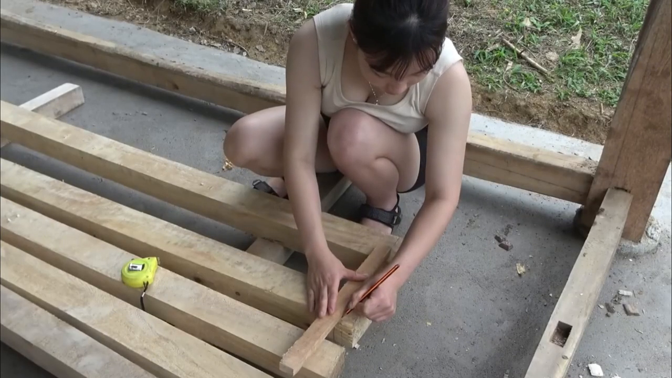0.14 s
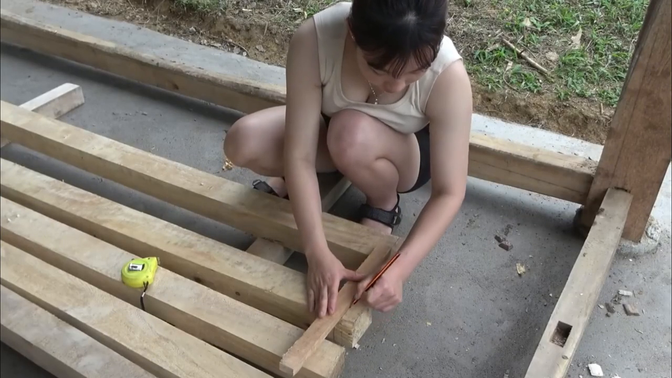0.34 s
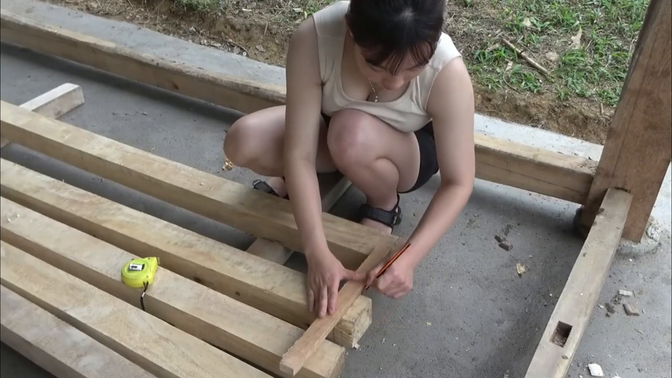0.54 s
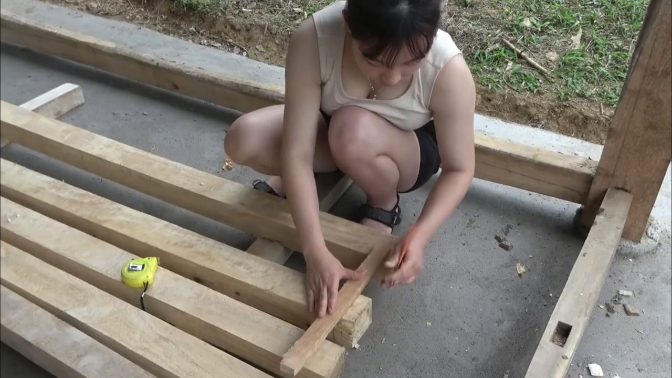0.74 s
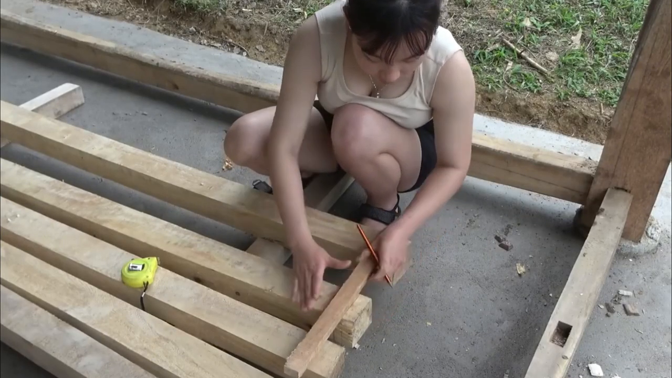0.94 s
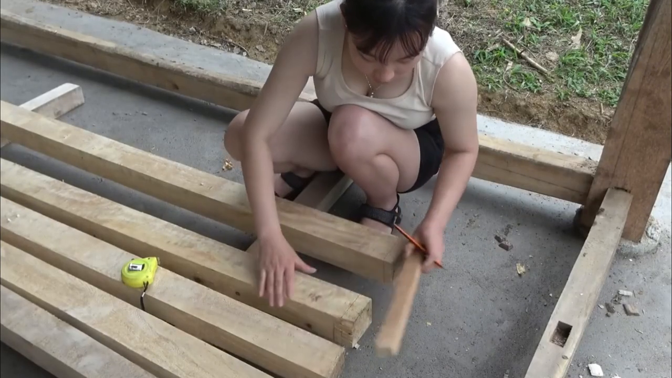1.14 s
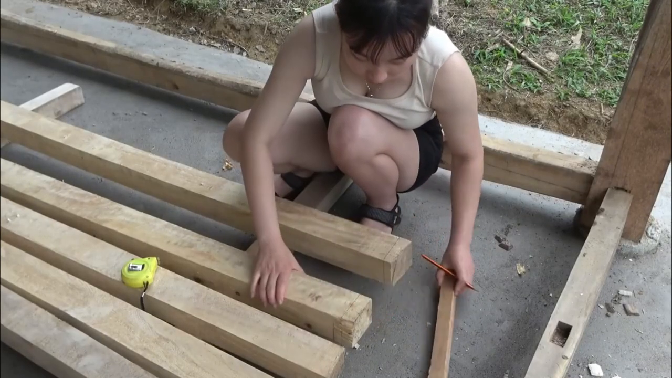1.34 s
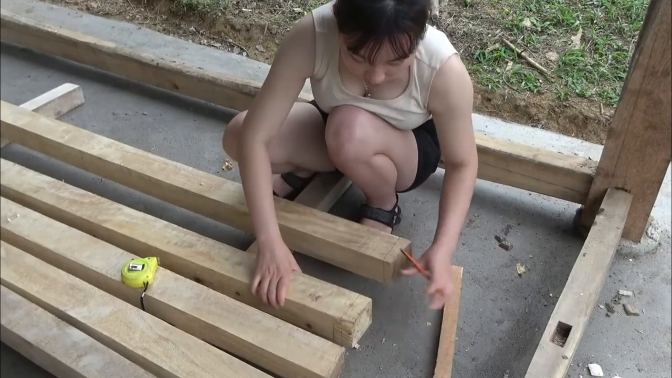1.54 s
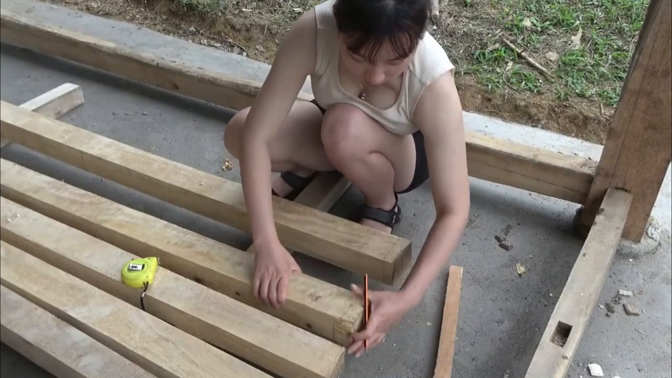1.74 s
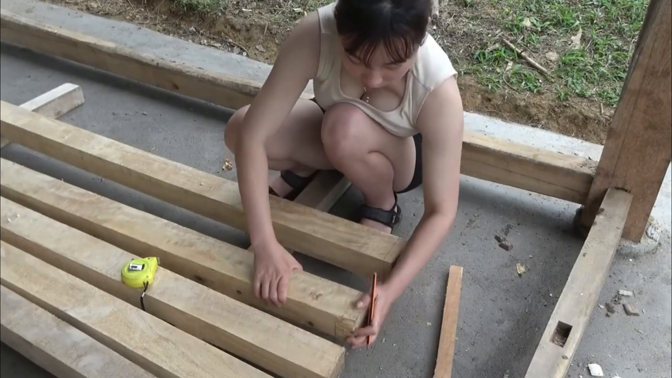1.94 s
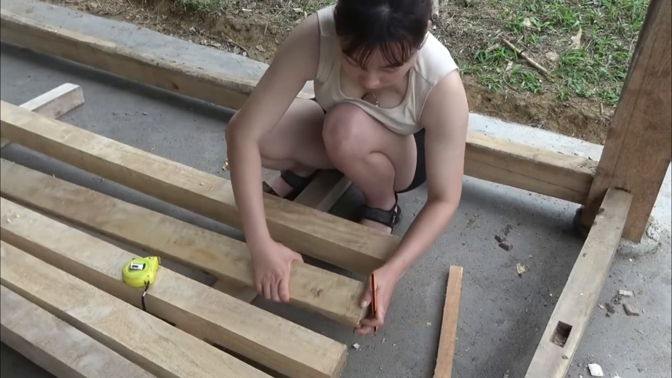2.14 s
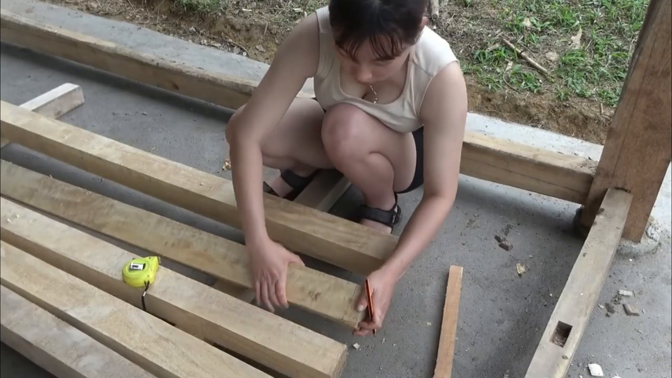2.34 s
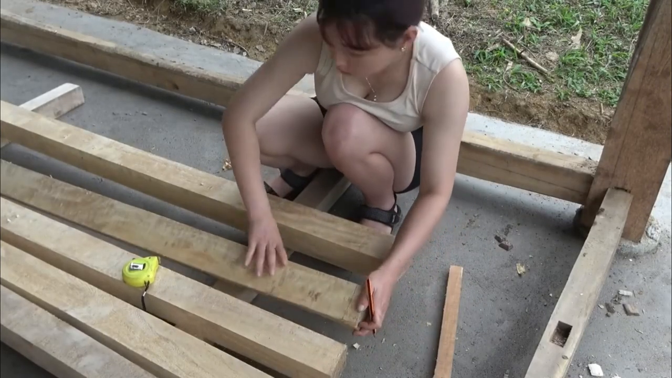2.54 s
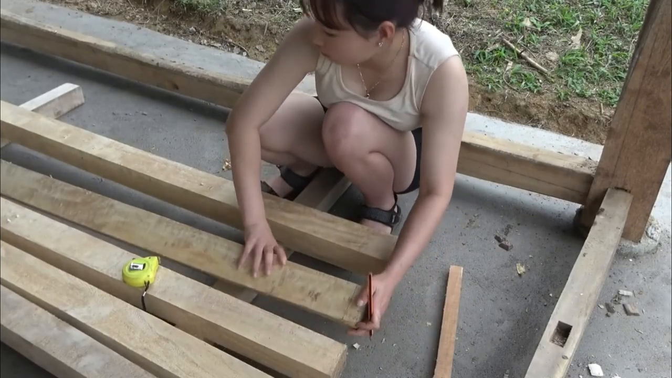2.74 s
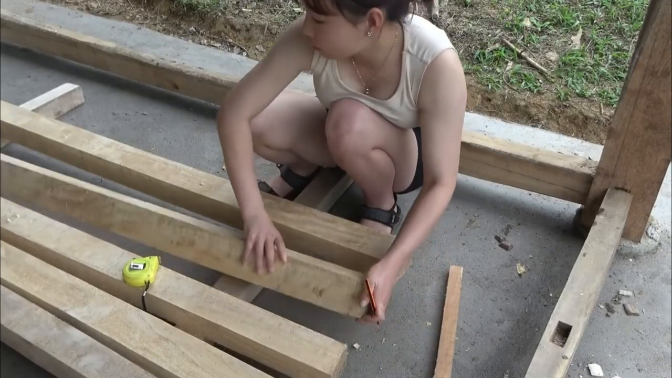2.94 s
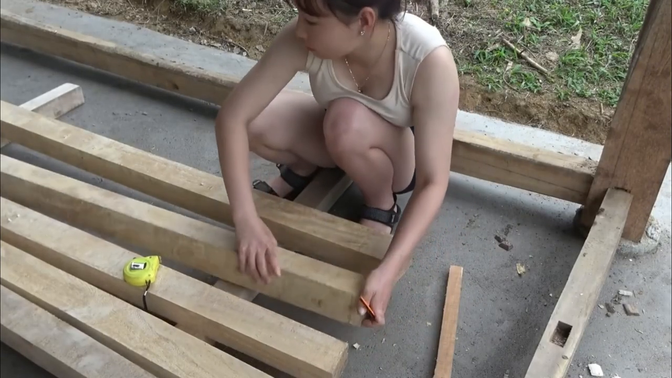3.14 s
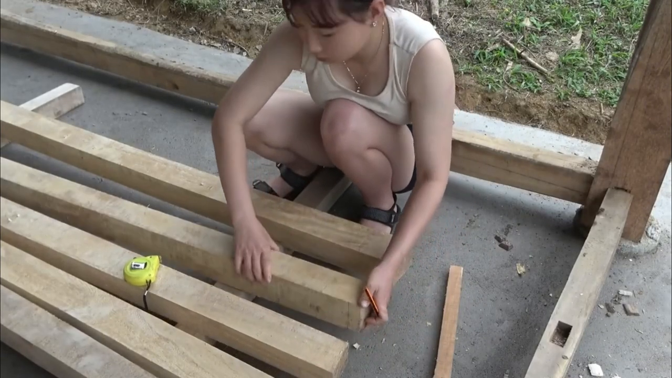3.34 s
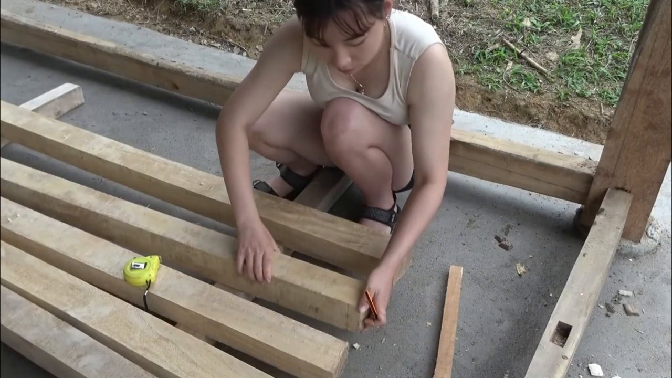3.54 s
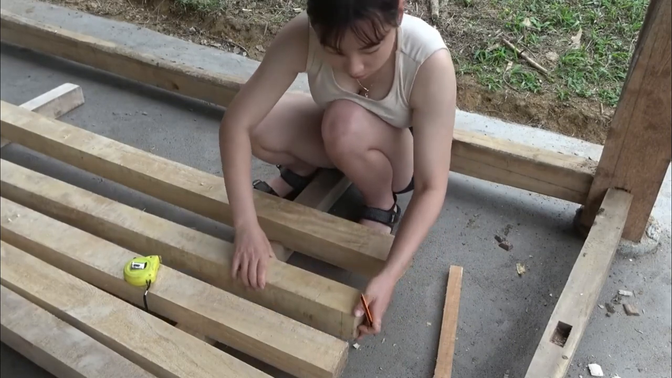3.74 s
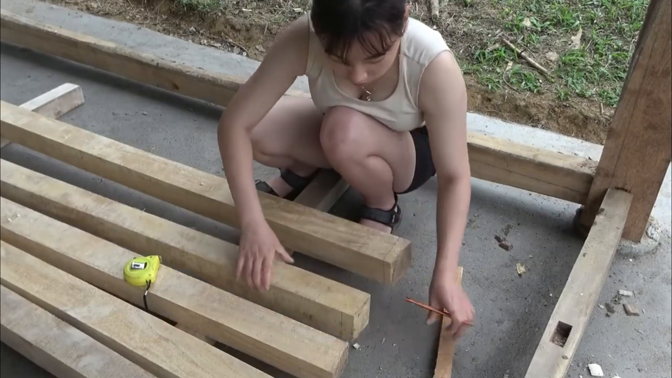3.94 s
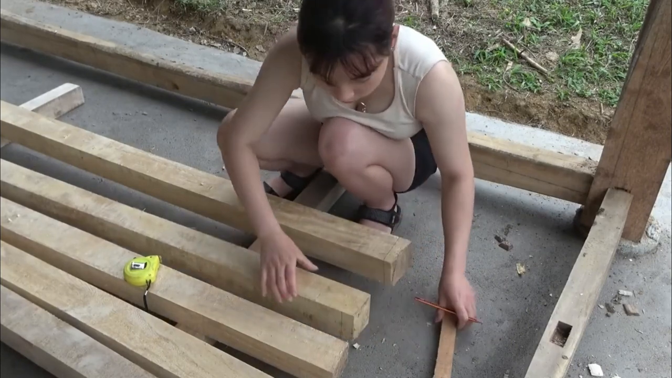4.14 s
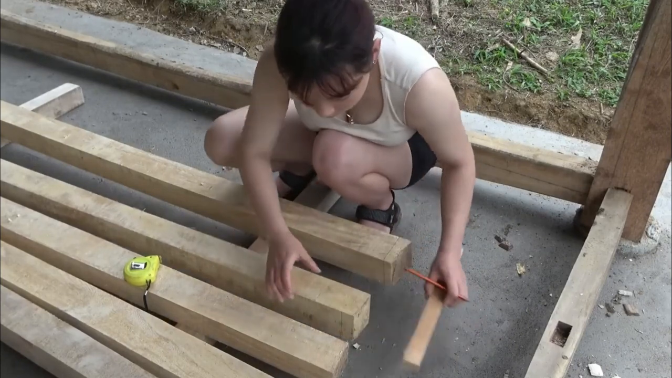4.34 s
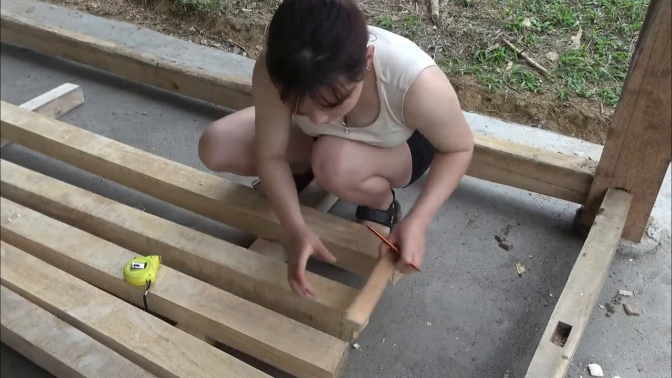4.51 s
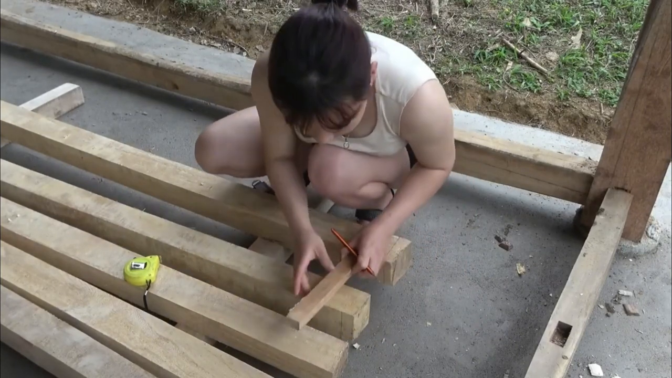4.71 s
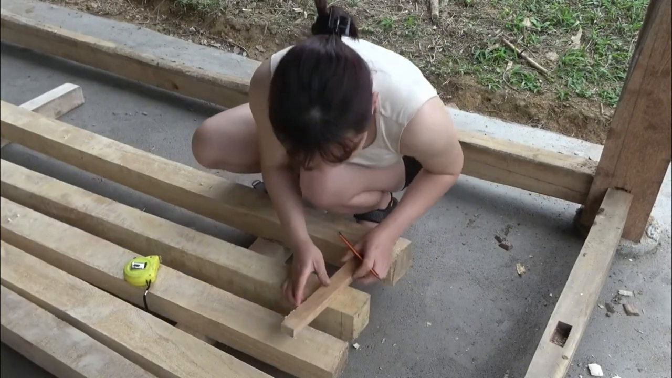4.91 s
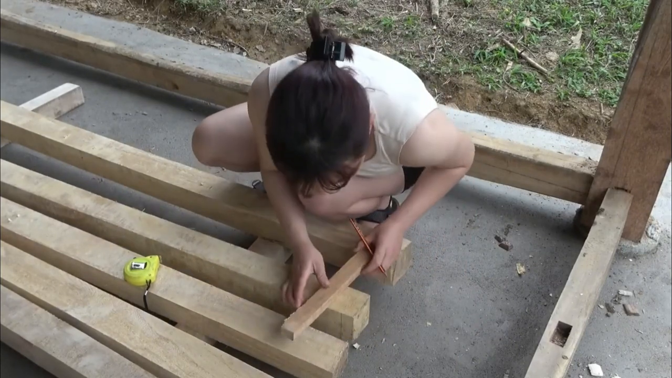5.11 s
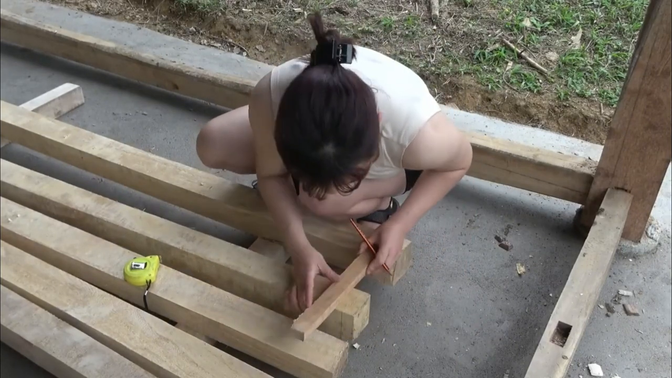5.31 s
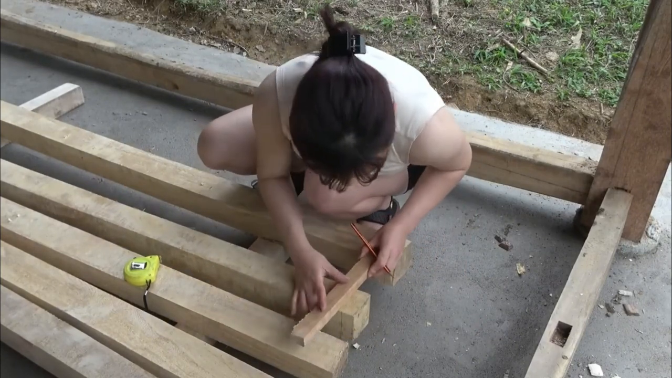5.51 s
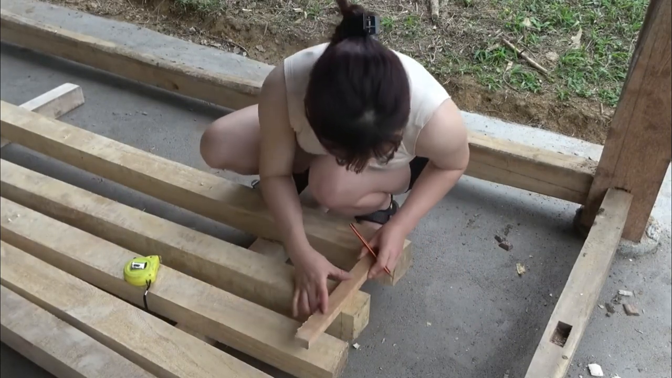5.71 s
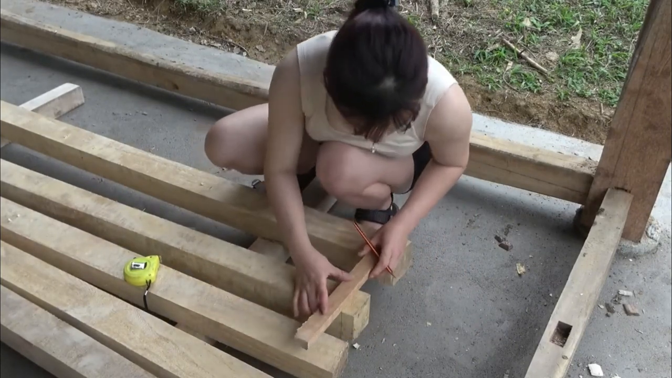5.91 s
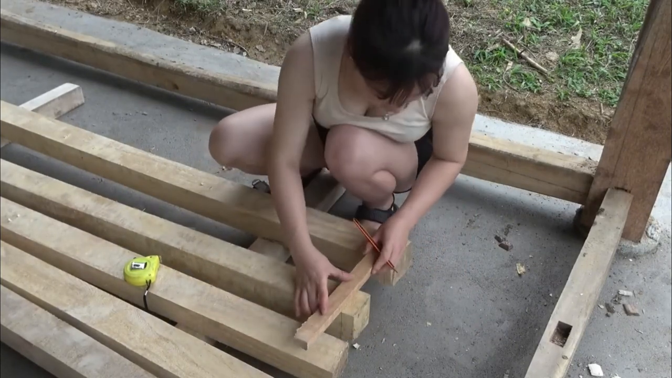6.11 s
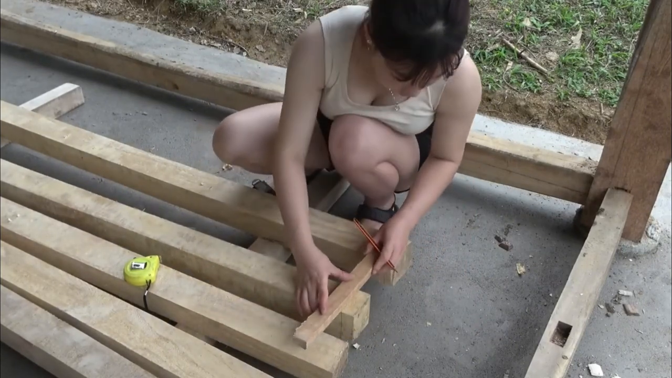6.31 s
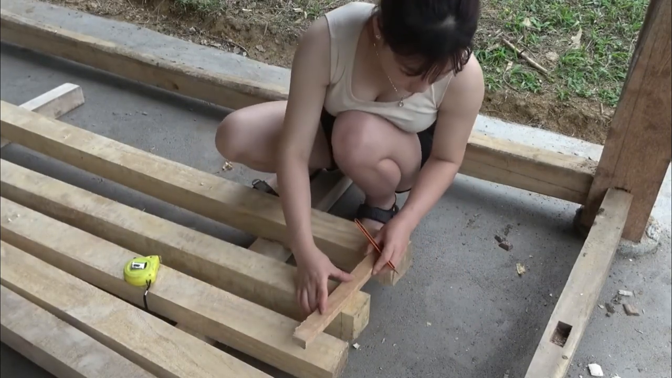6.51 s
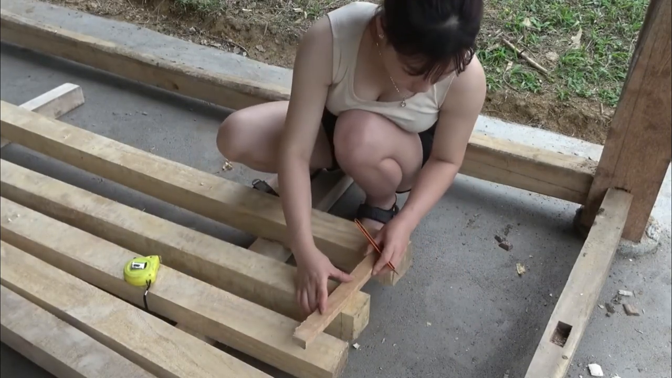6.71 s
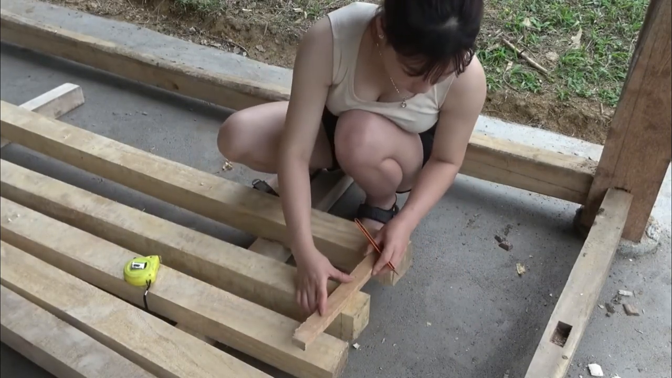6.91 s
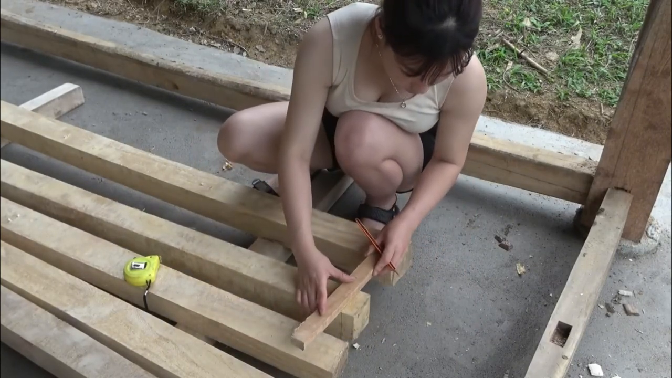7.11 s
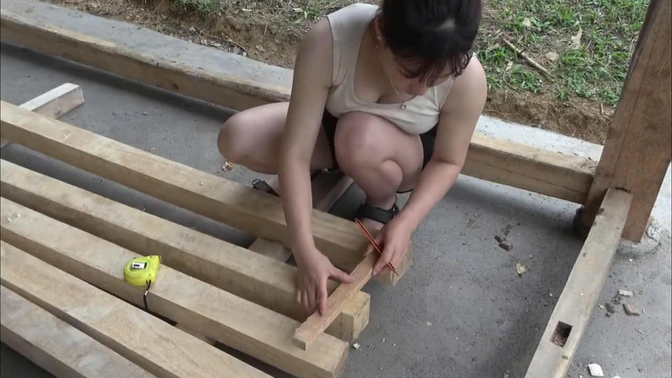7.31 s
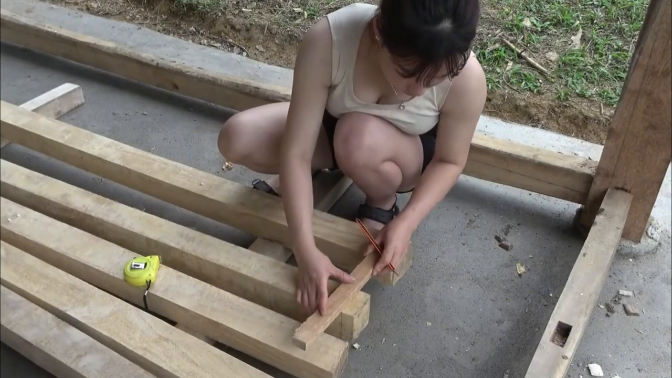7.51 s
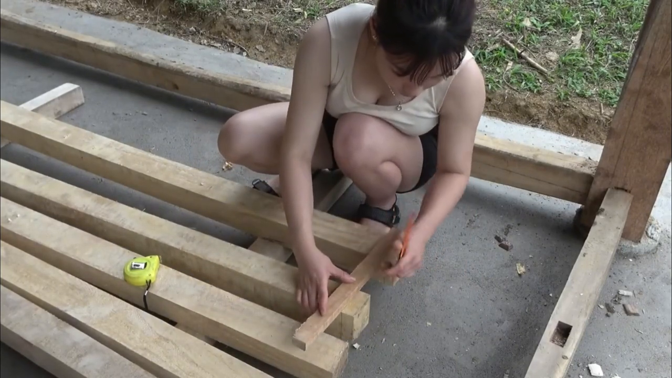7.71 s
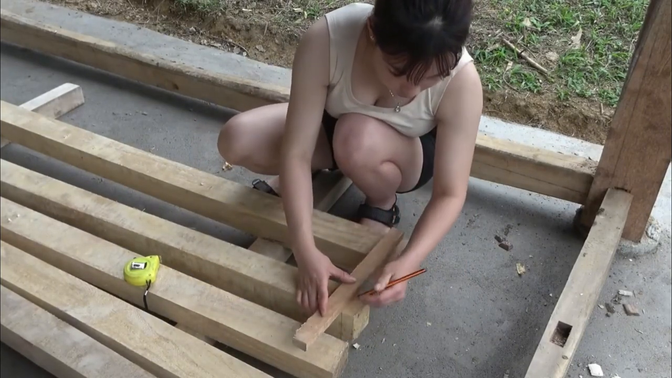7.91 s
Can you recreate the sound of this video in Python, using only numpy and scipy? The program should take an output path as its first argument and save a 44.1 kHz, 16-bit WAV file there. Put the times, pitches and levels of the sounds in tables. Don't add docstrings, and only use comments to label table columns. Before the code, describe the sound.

Close woody knocks, a heavy beam landing and rolling over, dry ticks and soft scrapes, with crickets trilling and insects rasping around.

```python
import sys
import numpy as np
from scipy import signal
from scipy.io import wavfile
from scipy.ndimage import uniform_filter1d

SR = 44100
rng = np.random.default_rng(int(sys.argv[2]) if len(sys.argv) > 2 else 0)


def transcribe(u):
    v = np.clip(np.atleast_2d(u).T, -1, 1)
    q = np.round(v * 32767).astype(np.int16)
    wavfile.write(sys.argv[1], SR, q)


def amplitude_ratio(level_db):
    exponent = np.asarray(level_db, float) / 20
    return 10 ** exponent


N = 350595


def evened(x):
    return x / np.sqrt(np.mean(x ** 2) + 1e-30)


def read(points, hz):
    f, value = np.transpose(points)
    return np.interp(np.log(hz + 1), np.log(f + 1), value)


def add(mix, s, sound, pan_db=0):
    part = mix[:, round(s * SR):][:, :len(sound)]
    part += sound[:part.shape[1]] * amplitude_ratio(np.array([[pan_db], [-pan_db]]) / 2)


def resonate(x, hz, width_hz):
    turn = np.exp(2j * np.pi * np.cumsum(hz * np.ones(x.shape[-1])) / SR)
    r = np.exp(-np.pi * width_hz / SR)
    return (turn * signal.lfilter([(1 - r) ** 2], [1, -2 * r, r ** 2], x / turn)).real


def band(x, low_hz, high_hz, order=2):
    return signal.sosfilt(signal.butter(order, [low_hz, high_hz], "bandpass", fs=SR, output="sos"), x)


def slow(seconds, count=N):
    span = max(round(seconds * SR), 2)
    return evened(uniform_filter1d(uniform_filter1d(rng.standard_normal(count), span), span))


def grains(count, per_s, spread_db):
    sign, chance, size = rng.random((count, 3)).T
    return np.sign(sign - .5) * (chance < per_s / SR) * amplitude_ratio(-spread_db * np.log(size + 0.0016))


# (frequency [Hz], density [dB/Hz])
AIR_SPECTRUM = [(40, -7), (120, -2), (250, -5), (600, -9.5), (1100, -8), (1600, -12.5), (3000, -16.5),
                (4500, -15.5), (6000, -13), (7700, -6), (9300, -14.5), (9800, -21), (13000, -20)]
# (frequency [Hz], correlation [-1..1])
AIR_LIKENESS = [(60, 1), (200, 0.15), (700, 0.56), (1500, 0.88), (5500, 0.97), (7000, 0.043), (13000, 0.32)]
# (time [s], length [s], rise over calm [dB])
GUSTS = [
    (1.546, 0.098, 16.5),
    (2.2, 0.32, 8),
    (3.366, 0.19, 18),
    (5.73, .15, 22),
]
AIR_DB, CALM_DB = -61, -84


def air():
    frames, hz = N // 256 + 5, np.fft.rfftfreq(1024, 1 / SR)
    a, b, c, d, patches = rng.standard_normal((frames, 513, 5)).T
    patches = evened(uniform_filter1d(uniform_filter1d(patches, 12, 0), 14, 1))
    same = np.clip(read(AIR_LIKENESS, hz), -1, 1)[:, None]
    left = a + 1j * b
    right = same * left + np.sqrt(1 - same ** 2) * (c + 1j * d)
    z = np.array([left, right]) * amplitude_ratio(read(AIR_SPECTRUM, hz)[:, None] + 1.9 * patches)
    wash = evened(signal.istft(z, nperseg=1024, noverlap=768)[1][:, :N])
    t = np.arange(N) / SR
    rise_db = sum(db * np.exp(-((t - s) / length_s) ** 4) for s, length_s, db in GUSTS)
    gusts = evened(band(rng.standard_normal(N), 39, 78)) * amplitude_ratio(CALM_DB + rise_db)
    return amplitude_ratio(AIR_DB) * wash + gusts


# (time [s], level [dB])
MID_CHORUS = [(0.0, -59), (0.64, -58), (0.84, -63), (2.5, -63), (3.899, -65.5), (4.8, -61), (5.5, -61),
              (5.76, -67), (6.55, -64), (7.68, -62), (7.95, -62)]
DRONE_DB, HIGH_CHORUS_DB = -72, -59.5


def choruses():
    mid_db = np.interp(np.arange(N) / SR, *np.transpose(MID_CHORUS))
    high_db = HIGH_CHORUS_DB + 2.1 * slow(1.0)

    low = evened(resonate(grains(N, 3000, 0.17), 1165 + 25 * slow(0.28), 160))
    low = low * amplitude_ratio(DRONE_DB + slow(0.074))

    mid = resonate(grains(N, 3000, 0.88), 4620 + 30 * slow(0.071), 535)
    mid = evened(band(mid, 3690, 4680)) * amplitude_ratio(mid_db - 2.6 + 1.84 * slow(0.011))

    clicks = np.array([grains(N, 9000, 2.1), grains(N, 9000, 1.2)])
    high = resonate(clicks, 7555, 960) + 0.76 * resonate(clicks, 8000, 710) + 0.67 * resonate(clicks, 9120, 300)
    high = evened(band(high, 3600, 10000))
    high = high + 0.1 * high[::-1]
    high = high * amplitude_ratio(high_db - 3.0 + 1.35 * slow(0.013)) * amplitude_ratio(np.array([[1.2], [-1.2]]))
    return low + mid + high


def whistle(start_s, end_s, to_hz, db):
    from_hz, length_s = 4500, end_s - start_s
    u = np.arange(round(length_s * SR)) / SR / length_s
    hz = from_hz + (to_hz - from_hz) * np.sin(1.21 * u) / np.sin(1.3)
    rasp = evened(resonate(grains(len(u), 2000, 1.3), hz, 350))
    swell = signal.windows.tukey(len(u), .4) * (0.31 + 0.2 * u)
    return amplitude_ratio(db) * rasp * swell * amplitude_ratio(0.83 * slow(0.022, count=len(u)))


# (start [s], end [s], end pitch [Hz], level [dB])
WHISTLES = [(0.126, 0.277, 6650, -54.5), (.55, 0.68, 5730, -56), (1.528, 1.667, 5760, -52.5),
            (1.701, 1.82, 6030, -53.5), (2.04, 2.15, 5770, -58), (2.847, 2.997, 6120, -50.5),
            (3.57, 3.698, 5840, -55), (4.401, 4.507, 5750, -52), (4.97, 5.1, 6200, -56),
            (5.165, 5.27, 5840, -55.5), (6.027, 6.134, 5900, -52), (6.893, 7.055, 6040, -56.5)]


def whistling_insect():
    mix = np.zeros((2, N))
    for row in WHISTLES:
        add(mix, row[0], whistle(*row), .3)
    return mix


def wing(db, hz):
    t = np.arange(round(.032 * SR)) / SR
    u = t / t[-1]
    sagging_hz = hz * (1.012 - 0.034 * u ** 2 + 0.008 * slow(0.009, count=len(t)))
    tone = np.sin(2 * np.pi * np.cumsum(sagging_hz) / SR)
    rough = evened(resonate(rng.standard_normal(len(t)), 0.956 * hz, 270))
    sound = (1 - 0.5 * u) * tone + (0.27 + 0.067 * u) * rough
    flutter = amplitude_ratio(0.28 * slow(0.0014, count=len(t)))
    return amplitude_ratio(db + 1.0) * sound * signal.windows.tukey(len(t), .3) * flutter


STROKE_GAP_S = .0513
HURRY, HURRY_STROKES = .25, .8
WING_HZ, COLD_HZ, COLD_DB, WARMING_STROKES = 4361, 333, -9.5, 1.73
WAVER_HZ, WAVER_DB = 37.3, 0.5


def trill(opening_s, first_s, last_s, db):
    run_s = last_s - first_s
    gaps = 1 - HURRY * np.exp(-np.arange(round(run_s / STROKE_GAP_S)) / HURRY_STROKES)
    times = np.r_[opening_s, first_s, first_s + run_s * np.cumsum(gaps) / gaps.sum()]
    cold = np.exp(-np.arange(len(times)) / WARMING_STROKES)
    chance = rng.standard_normal((len(times), 2)).T
    return zip(times, db + COLD_DB * cold + WAVER_DB * chance[0], WING_HZ - COLD_HZ * cold + WAVER_HZ * chance[1])


# (lone opening stroke [s], first of the run [s], last stroke [s], level [dB])
TRILLS = [(.253, .344, .8405, -51.5), (1.9375, 2.0315, 2.424, -51.5), (3.475, 3.5818, 4.033, -52),
          (4.621, 4.7042, 5.215, -52), (6.11, 6.1938, 6.6468, -51.5), (7.4665, 7.535, 7.937, -52)]


def cricket():
    mix = np.zeros((2, N))
    for row in TRILLS:
        for s, *closing in trill(*row):
            add(mix, s, wing(*closing), -6.)
    return mix


def body(modes, hard_db, low_db, crowd_db):
    crowd_hz = np.geomspace(410, 4300, num=50) * rng.uniform(0.91, 1.02, size=50)
    crowd_levels_db = crowd_db - 3.6 * np.maximum(np.log2(crowd_hz / 700), 0)
    crowd = np.transpose([crowd_hz, crowd_levels_db, 0.045 * np.sqrt(700 / crowd_hz)])
    hz, db, t60 = np.transpose(np.vstack([modes, crowd]))[:, :, None]
    db = db + hard_db * np.maximum(np.log2(hz / 640), 0)
    db = db + low_db * np.clip(np.log2(640 / hz) / 1.9, 0, 1)
    t = np.arange(SR // 4) / SR
    signs = np.sign(rng.random(hz.shape) - .5)
    rings = signs * amplitude_ratio(db - 60 * t / t60) * np.sin(2 * np.pi * hz * t)
    return band(rings.sum(0) * (1 - np.exp(-t / .0005)), 106, 8000)


# (frequency [Hz], level [dB], t60 [s])
BEAM = [(153.6, -14, 0.19), (224, -15.5, 0.098), (186, -18, 0.2), (289.8, -20.5, 0.29), (428, -1, 0.066),
        (446.5, -4.5, 0.13), (518, -7, 0.21), (638, 3.5, 0.05), (766, -22.5, 0.38), (805, -3, 0.038),
        (984, -19, 0.24), (1085, -6, 0.056), (1172.5, -11.5, 0.16), (1342, -6, 0.041), (1546, -18, 0.07),
        (1850, -21.5, 0.11), (2070, -26, 0.25), (2144, -22, 0.1), (2360, -20.5, 0.15), (2630, -54, 0.19)]
STROKE_DEPTH_DB = 22


def stroke(mix_db, s, rise_s, hold_s, fall_s, db):
    t = np.arange(-rise_s, hold_s + fall_s, 1 / SR)
    count = len(t)
    low_db, upper_db, grit_db, hiss_db = mix_db
    push_db = db - STROKE_DEPTH_DB * np.maximum(np.maximum(-t / rise_s, (t - hold_s) / fall_s), 0)
    slips = amplitude_ratio(1.5 * slow(0.007, count=count))
    ring = signal.fftconvolve(slips * grains(count, 1200, 2.9), body(BEAM, 1.9, 1.9, -11.0))[:count]
    low = evened(band(ring, 70, 706, order=3))
    upper = evened(band(ring, 446, 1980, order=3))
    grit = evened(slips * band(grains(count, 5000, 3.), 1000, 3840))
    hiss = evened(slips * band(grains(count, 17000, 1.5), 4400, 13300))
    sound = amplitude_ratio(low_db) * low + amplitude_ratio(upper_db) * upper
    sound = sound + amplitude_ratio(grit_db + 2.5) * grit + amplitude_ratio(hiss_db + 11.5) * hiss
    return s - rise_s, sound * amplitude_ratio(push_db) * signal.windows.tukey(count, .15)


# (full strength [s], rise [s], hold [s], fall [s], level [dB])
BRUSHES = [(0.361, 0.026, 0.32, 0.1, -83), (2.098, 0.082, .04, 0.034, -71.5),
           (2.162, 0.043, 0.022, 0.066, -65), (2.5, .08, .01, .06, -82), (2.971, 0.066, 0.027, .2, -73),
           (3.13, 0.11, 0.01, 0.097, -72), (4.36, 0.0049, .01, 0.064, -70), (5.105, 0.046, .01, .1, -73.5)]
DRAGS = [(.46, 0.18, 0.028, 0.53, -58), (1.14, 0.13, 0.041, 0.12, -70), (1.66, 0.042, 0.041, 0.094, -73),
         (2.15, .09, 0.0037, .01, -51.5), (2.83, 0.077, .01, 0.13, -62), (2.99, 0.043, .17, .02, -45.5),
         (3.324, 0.057, 0.0029, 0.0088, -48), (3.75, 0.16, 0.037, 0.17, -54.5), (5.63, .07, 0.068, .4, -62)]
SCUFFS = [(0.684, 0.12, 0.0063, 0.06, -61), (1.1, 0.13, .01, 0.045, -69),
          (1.785, 0.063, 0.008, 0.088, -64.5), (2.311, 0.045, 0.023, 0.089, -63.5),
          (2.949, 0.026, 0.029, .05, -61.5), (4.362, 0.0067, .02, 0.19, -65.5),
          (4.44, 0.086, 0.017, 0.16, -62.5), (6.085, 0.098, .01, 0.07, -68.5)]
SETTLING = [
    (2.225, .02, 0.0082, 0.21, -40),
    (3.2, 0.012, 0.012, 0.31, -42),
    (3.37, .015, 0.0063, 0.23, -43.5),
    (5.027, 0.021, 0.0066, 0.12, -55),
]
# (low modes [dB], upper modes [dB], grit [dB], fine hiss [dB])
BRUSH_MIX, DRAG_MIX = (-5, 5, 1, 0.5), (-3., 1.5, -14, -29)
SCUFF_MIX, SETTLING_MIX = (-5, -1, 0., -14.), (-0.5, -4.5, -22.5, -49)


def wood_strokes():
    mix = np.zeros((2, N))
    for mix_db, rows in [(BRUSH_MIX, BRUSHES), (DRAG_MIX, DRAGS), (SCUFF_MIX, SCUFFS), (SETTLING_MIX, SETTLING)]:
        for row in rows:
            add(mix, *stroke(mix_db, *row), -.4)
    return mix


def knock(modes, touch, rise_s, crowd_db, snap_db, chatter_t60, db, hard_db, chatter_db, low_db):
    t = np.arange(SR // 5) / SR
    chatter = amplitude_ratio(chatter_db - 60 * t / max(chatter_t60, .005)) * (1 - np.exp(-t / rise_s))
    force = chatter * grains(len(t), 1500, 0.2)
    force[0] = touch
    wood = body(modes, hard_db, low_db, crowd_db)
    contact = np.gradient(np.exp(-(np.arange(len(wood)) / 2.5 - 3) ** 2))
    wood = wood - amplitude_ratio(snap_db + 1.45 * hard_db) * contact
    sound = signal.fftconvolve(np.convolve(force, np.hanning(7)), wood)
    return amplitude_ratio(db) * sound / abs(sound).max()


# (frequency [Hz], level [dB], t60 [s])
BEAM_END = [(673, -2, 0.14), (1076, 6.5, 0.043), (1380, -17, 0.033), (2060, -16, 0.024)]
SLAT = [(167.5, -1.5, 0.088), (273, -7.5, 0.091), (535.5, -1.5, 0.32), (1006, 8, 0.022), (1393, 7.5, 0.031),
        (1940, 4, 0.014), (2520, 1.5, 0.026), (2930, -10, 0.012), (3400, -41, 0.094), (3830, -23, 0.043)]
RESTING_SLAT = [(169, -19.5, 0.2), (492, -10.5, 0.25), (539, 6.5, 0.15), (728, -2, 0.14), (985, -8, 0.28),
                (1119.5, 1.5, 0.069), (1210, -11, 0.09), (1295, -10, 0.052), (1465, -10.5, 0.047),
                (1960, -15, 0.11), (2548, -14, 0.085), (2830, -45, 0.079)]
# (time [s], peak [dB], hardness [dB/octave], chatter [dB], low modes [dB])
PENCIL_KNOCKS = [(0.394, -54, 14, -15, -2.2), (0.455, -48.5, 3, -11, -1.9), (0.484, -49.5, -13, -7, -1.5),
                 (0.519, -57, -3, 1, -0.76), (0.574, -51.5, 1, -3, -1.2), (0.655, -48.5, -9, -12, -1.5),
                 (0.678, -40.5, 10, -14.5, -1.8), (2.797, -51.5, 13, -9, -1.5),
                 (3.51, -43.5, -13, -9, -1.5)]
SLAT_KNOCKS = [
    (1.059, -56, 9, -12.0, -4),
    (1.425, -26, 4, -25, -4),
    (1.475, -40, 17, 10, -3),
    (1.525, -42.5, -0.5, -7, -1),
    (1.617, -33.5, 0, 3, 1),
    (2.955, -52, 11, -19, 5),
    (5.919, -51.5, 15, -12.0, -7),
]
BEAM_KNOCKS = [
    (2.155, -20, -4.5, 9, -9),
    (2.176, -22.5, -3.5, 25, -5),
    (2.197, -25, -2, 4, 4),
    (2.987, -45, 0, -12, -1.5),
    (3.171, -25, -8, -6.5, -3),
    (3.329, -18, -9.5, 10, -5),
    (3.354, -33.5, -1.5, 7, 15),
    (3.404, -49, -8, -8, 16),
]
LAYING_KNOCKS = [
    (4.958, -23, 3.1, -1, -16),
    (4.976, -31, 0.82, -3, 4),
]


def wood_knocks():
    mix = np.zeros((2, N))
    # (modes, first touch, closing [s], crowd [dB], snap [dB], chatter t60 [s], pan [dB], knocks)
    for *piece, pan_db, knocks in [(BEAM_END, .4, .002, -19., -8., .033, -.6, PENCIL_KNOCKS),
                                   (SLAT, .7, .0006, -6., 20., .013, .7, SLAT_KNOCKS),
                                   (BEAM, .25, .002, -4., -12., .047, -1.5, BEAM_KNOCKS),
                                   (RESTING_SLAT, .2, .004, -12., -18., .04, -.6, LAYING_KNOCKS)]:
        for s, *blow in knocks:
            add(mix, s, knock(*piece, *blow), pan_db)
    return mix


def tick(db, t60):
    tick_hz = 9000
    t = np.arange(SR // 8) / SR
    force = 0.1 * rng.standard_normal(len(t)) * amplitude_ratio(-60 * t / max(t60, .003))
    force[0] = 1
    sound = band(force, 0.23 * tick_hz, min(2.5 * tick_hz, 20000), order=1)
    return amplitude_ratio(db) * sound / abs(sound).max()


# (time [s], peak [dB], tail t60 [s])
TICKS = [(0.68, -32, 0.04), (1.4255, -39, 0.06), (2.096, -42, 0.03), (2.145, -32, 0.09),
         (2.8444, -38, 0.03), (3.914, -35.5, 0.059), (4.3564, -21.5, 0.019), (4.4508, -31.5, 0.059),
         (5.1043, -54, 0.028), (6.0464, -39, 0.03)]


def dry_ticks():
    mix = np.zeros((2, N))
    for s, *crack in TICKS:
        add(mix, s, tick(*crack))
    return mix


def shelter(x, t60, dull_hz, shared):
    taps = grains(SR, 2000, 0.091).reshape(2, -1) * amplitude_ratio(-60 * np.arange(SR // 2) / SR / t60)
    taps = taps + shared * taps[::-1]
    taps = band(np.pad(taps, ((0, 0), (150, 0))), 56, dull_hz, order=1)
    return signal.fftconvolve(x.mean(0)[None], taps / np.linalg.norm(taps[0]), axes=1)[:, :N]


def scene():
    insects = whistling_insect() + cricket()
    wood = wood_strokes() + wood_knocks() + dry_ticks()
    insect_echo = amplitude_ratio(-9) * shelter(insects, 0.24, 9000, 0.41)
    wood_echo = amplitude_ratio(-10) * shelter(wood, 0.26, 6800, 0.75)
    return air() + choruses() + insects + insect_echo + wood + wood_echo


def starved(x, under_db, left_db):
    hz, t, z = signal.stft(x, SR, nperseg=1024, noverlap=768)
    power = uniform_filter1d(abs(z.mean(0)) ** 2 + 1e-20, size=11, axis=1)
    near_db = 10 * np.log10(uniform_filter1d(power, size=2, axis=0))
    around_db = uniform_filter1d(near_db, size=15, axis=0)
    weak = (near_db < around_db + under_db) & (hz[:, None] > 1500)
    return signal.istft(z * np.where(weak, amplitude_ratio(left_db), 1), SR, nperseg=1024, noverlap=768)[1][:, :N]


def top_cut(x):
    return signal.sosfilt(signal.butter(12, 14180, fs=SR, output="sos"), x)


def record(dry):
    edge = signal.firwin(801, 13080, window=("kaiser", 5), fs=SR)
    limited = signal.oaconvolve(dry, edge[None], "same")
    thinned = starved(limited, under_db=-3., left_db=-18.)
    return top_cut(thinned)


dry = scene()
out = record(dry)
transcribe(out)
```